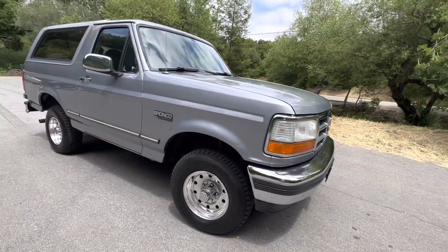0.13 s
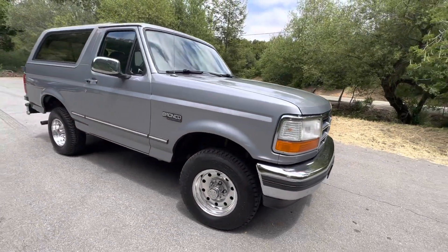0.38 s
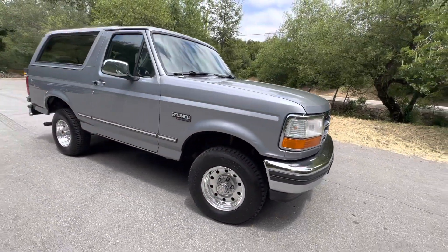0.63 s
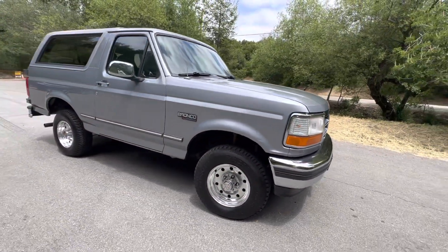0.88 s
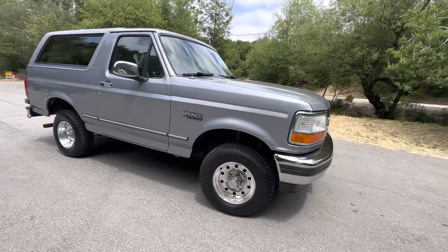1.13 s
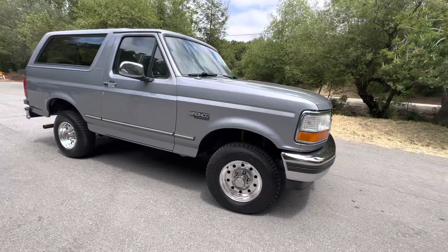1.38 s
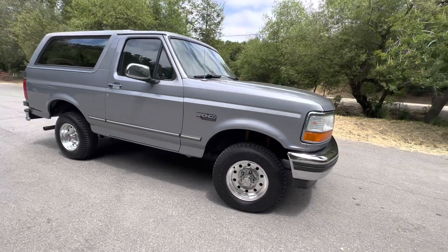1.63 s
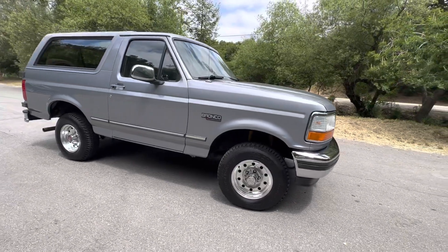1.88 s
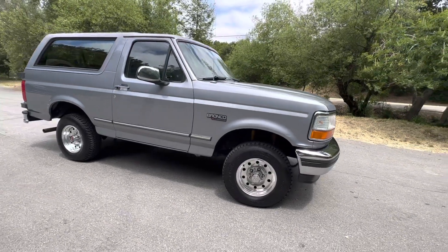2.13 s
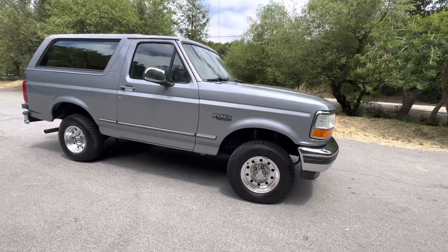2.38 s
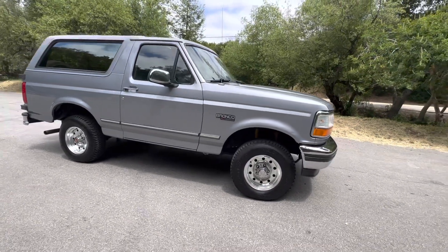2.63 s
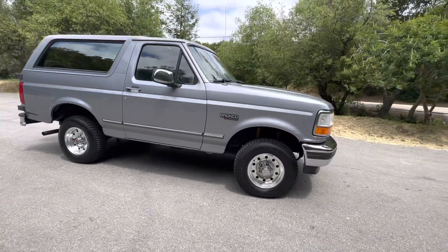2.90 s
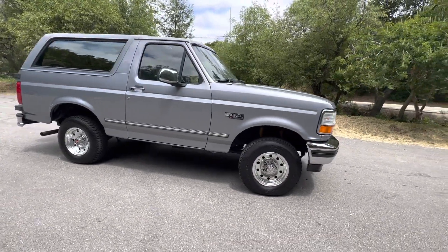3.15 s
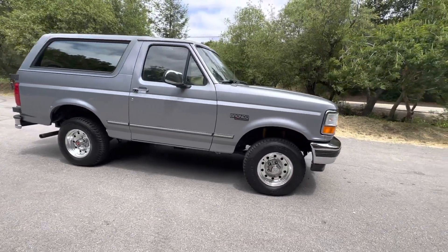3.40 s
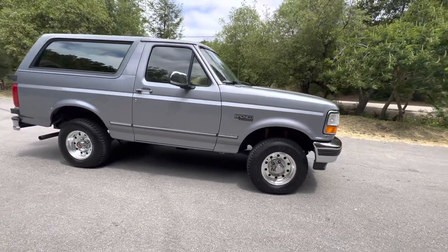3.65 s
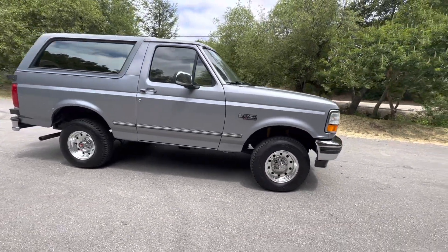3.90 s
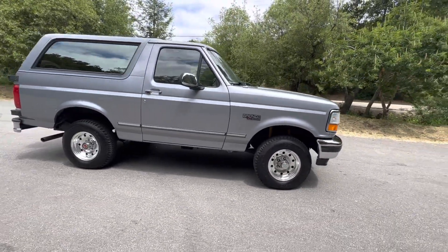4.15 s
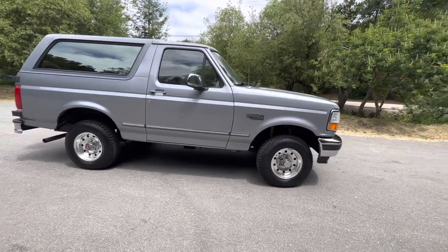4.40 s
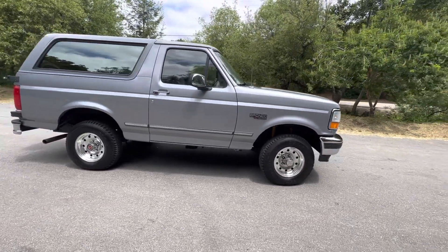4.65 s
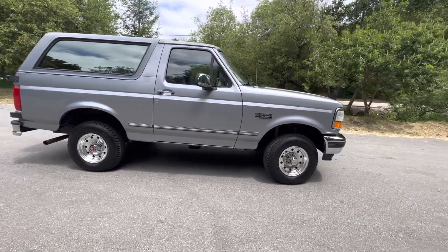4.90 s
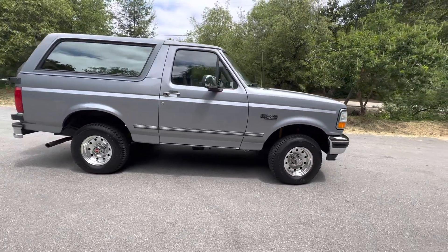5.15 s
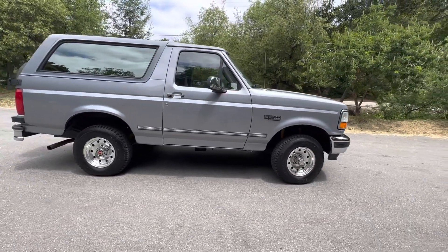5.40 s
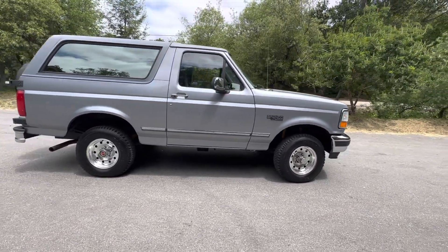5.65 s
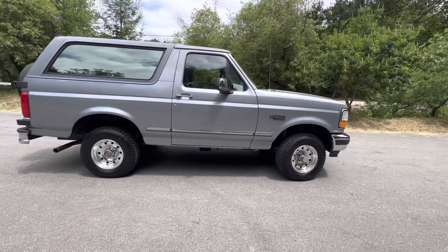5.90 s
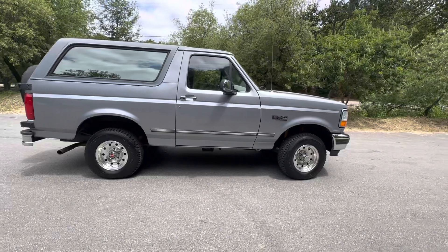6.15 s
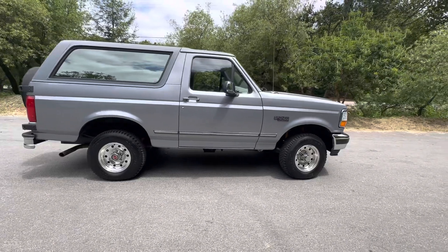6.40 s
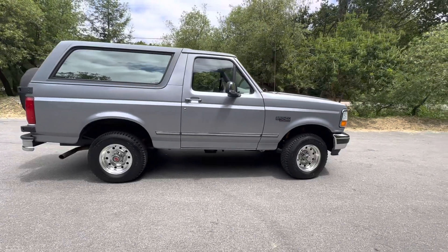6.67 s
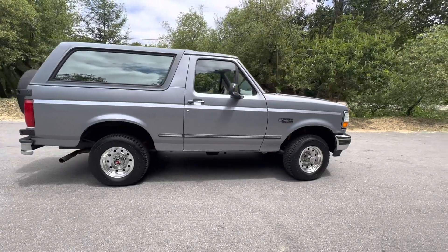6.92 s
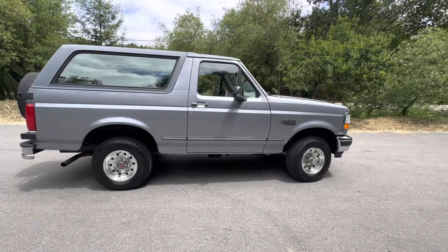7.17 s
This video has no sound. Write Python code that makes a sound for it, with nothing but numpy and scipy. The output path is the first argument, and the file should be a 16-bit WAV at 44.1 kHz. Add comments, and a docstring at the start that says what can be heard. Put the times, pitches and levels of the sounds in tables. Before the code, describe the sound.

Close, irregular footsteps crunch and tap on pavement, mostly small hollow knocks with crisp grit ticks and soft scuffs. Several birds sing in the wood alongside: bright repeated chips, sliding warbles and short buzzes, followed by a rapid descending trill and a buzzing series, then warbles return. A handheld stereo microphone picks up a deep uneven wind rumble, distant traffic drone and quiet leaf hiss, with birds and steps leaning left.

```python
"""Slow steps on gritty asphalt beside a wood

Someone walks slowly, holding a small two-port microphone. Soles knock, drag and squeak: damped rings,
bursts of random grit clicks and short gliding tones. Several birds chip, warble, whistle, buzz and trill
as sines on fast pitch tracks, smeared by a noise-built haze of trees. Far traffic and wind on the ports
rumble and leaves hiss, all as shaped, flickering noise."""
import sys
import numpy as np
from scipy import signal
from scipy.fft import rfft, irfft, next_fast_len
from scipy.io import wavfile
from scipy.ndimage import uniform_filter1d

SR = 44100
rng = np.random.default_rng(int(sys.argv[2]) if len(sys.argv) > 2 else 0)


def volts_from_decibels(level):
    """Turn decibel levels (scalar or array-like) into linear amplitude factors."""
    exponent = np.asarray(level, float) / 20
    return 10 ** exponent


def inscribe(sig):
    """Save sig as 16-bit PCM at rate SR to the path in sys.argv[1].

    A 1-D sig is mono; a 2-D sig holds one channel per row.
    Samples are clipped to [-1, 1] before scaling.
    """
    pcm = np.round(np.clip(np.atleast_2d(sig).T, -1, 1) * 32767)
    wavfile.write(sys.argv[1], SR, pcm.astype(np.int16))


N = 321515
MARGIN = 512  # samples carried on past each end before a phase turn


def columns(rows):
    """Curve columns read at every sample."""
    s, *rest = np.transpose(rows)
    return [np.interp(np.arange(N) / SR, s, c) for c in rest]


def along(rows, size):
    """A (f/Hz, value) table read at every FFT bin, straight on a log-frequency axis."""
    hz, value = np.transpose(rows)
    bin_hz = np.arange(size // 2 + 1) * SR / size
    return np.interp(np.log(bin_hz + 1), np.log(hz), value)


def unit(x):
    """Scale to rms 1."""
    return x / np.sqrt(np.mean(x ** 2))


def pan(db):
    """Left and right gains for a level difference."""
    return volts_from_decibels(np.array([db, -db]) / 2)


def add(out, s, sound):
    """Mix a two-channel sound in at time s."""
    i = int(s * SR)
    out[:, i:i + sound.shape[1]] += sound[:, :N - i]


def band(x, lo_hz, hi_hz):
    """Band-pass."""
    return signal.sosfilt(signal.butter(2, [lo_hz, hi_hz], "band", fs=SR, output="sos"), x)


def walk(rate):
    """Random levels held 1 / rate s and slewed twice; spread near 1."""
    k = int(SR / rate)
    held = np.repeat(rng.standard_normal(N // k + 1), k)
    return 1.17 * uniform_filter1d(uniform_filter1d(held, k), k)[:N]


def swells(rows):
    """Level curve of bursts (middle, half length, dB), bell-shaped in power over a faint rest."""
    t = np.arange(N) / SR
    rest_db = -86
    bells = sum(volts_from_decibels(2 * db) * np.exp(-2 * ((t - s) / half) ** 2) for s, half, db in rows)
    return np.sqrt(volts_from_decibels(2 * rest_db) + bells)


def noise(shape, alike, flicker_db, rate, tilt):
    """Two-channel noise of a given spectrum and likeness between ports; each half octave flickers alone."""
    size = next_fast_len(N)
    mid, side = rfft(rng.standard_normal((2, size)))
    c = np.clip(alike, 0, 1)
    pair = np.array([mid, c * mid + np.sqrt(1 - c * c) * side])
    pair *= volts_from_decibels(along(shape, size)) * pan(along(tilt, size))
    octave = np.log2(np.arange(size // 2 + 1) * SR / size + 1)
    lo, hi = np.log2(shape[0][0]), np.log2(shape[-1][0])
    pair *= (octave > lo) & (octave < hi)
    out = 0
    for centre in np.arange(lo, hi + .5, .5):
        weight = np.clip(1 - 2 * abs(octave - centre), 0, 1)
        out = out + irfft(pair * weight, size)[:, :N] * volts_from_decibels(flicker_db * walk(rate))
    return unit(out)


def tone(hz, gain):
    """A sine along a pitch track, with soft ends."""
    i = np.arange(len(hz))
    ends = np.clip(np.minimum(i, i[::-1]) / (0.0011 * SR), 0, 1)
    return np.sqrt(2) * gain * np.sin(2 * np.pi * np.cumsum(hz) / SR) * ends


def notes(slides, pan_db, flutter_db, shake_hz, bends=(), dives=()):
    """Near-pure notes: slides ease between pitches, bends arch, dives settle; air makes them flutter."""
    out = np.zeros((2, N))
    flutter = volts_from_decibels(flutter_db * np.array([walk(70.), walk(70.)]))
    shake = shake_hz * walk(300.)
    glides = (lambda u: np.sin(np.pi / 2 * u) ** 2,
              lambda u: np.sin(np.pi * u) ** 2,
              lambda u: 1 - np.exp(-u / .26))  # settling time as a share of the note
    for glide, rows in zip(glides, (slides, bends, dives)):
        for s, length, from_hz, to_hz, db in rows:
            t = np.arange(0, length, 1 / SR)
            track = from_hz + (to_hz - from_hz) * glide(t / length)
            track = track + shake[int(s * SR):][:len(t)]
            note = tone(track, volts_from_decibels(db) * np.hanning(len(t)) ** 0.12)
            add(out, s, note * pan(pan_db)[:, None])
    return out * flutter


def mirrored(x):
    """Carry the sound on smoothly past both ends and let it fade there."""
    wide = np.pad(x, MARGIN, mode="reflect", reflect_type="odd")
    return wide * signal.windows.tukey(len(wide), 2 * MARGIN / len(wide))


def steps():
    """Each knock is a damped ring of a cycle or two with a crumble of grit; ticks are single snaps."""
    # sole knocks on grit: t/s, level/dB, ring f/Hz, crumble level re knock/dB
    knocks = [(0.198, -59, 1750, -1.5), (0.425, -52.5, 853, -22), (1.274, -44, 1160, -23.5),
              (1.444, -46, 1280, -12.5), (1.454, -40.5, 1550, -43), (1.571, -46.5, 1340, -28),
              (1.634, -60, 1490, -4), (2.195, -45, 1240, -30), (2.433, -52.5, 1270, -17),
              (2.471, -41.5, 1240, -21), (2.547, -49.5, 1290, -22), (3.035, -54, 1400, -3.5),
              (3.332, -50.5, 930, -10), (3.998, -46, 1240, -35), (4.051, -51, 1240, -20),
              (4.2, -49, 1550, -16.5), (4.893, -58.5, 1570, -5), (4.954, -51, 1210, -22),
              (5.104, -49, 1520, -17), (5.85, -52.5, 1010, -13), (6.086, -54, 1370, -10.5),
              (6.769, -44, 1530, -20), (7.054, -51.5, 1350, -19)]
    # bright grit ticks: t/s, level/dB, top-band peak re lower-band peak/dB
    ticks = [(0.1877, -57, -7), (0.619, -47, -18.5), (1.443, -59, 14), (2.3724, -54.5, -17),
             (2.433, -41.5, -17), (2.4473, -45.5, 0.5), (2.504, -39.5, -32), (2.7352, -56, -17.5),
             (3.036, -46.5, -20.5), (3.062, -69, 8.5), (3.43, -62.5, 3.5), (3.914, -52, -20.5),
             (3.995, -51, -21.5), (4.17, -76, 15), (4.8907, -65, 4.5), (5.8480, -54, -12)]
    out, t = np.zeros((2, N)), np.arange(int(.09 * SR)) / SR
    for (s, db, hz, grit_db), grit in zip(knocks, rng.standard_normal((len(knocks), 2, len(t)))):
        ring = np.sin(2 * np.pi * hz * t) * np.exp(-t * hz * .7)
        # harder knocks snap brighter
        snap = volts_from_decibels(1.3 * (db + 40)) * 1.6 * np.sin(2 * np.pi * 3500 * t) * np.exp(-t / .0003)
        # noise raised to odd powers is spiky: separate grains of grit
        spiky = grit[0] ** 5 / 4 + grit ** 3
        crumble = unit(band(band(spiky, 700, 2500), 700, 2500))
        crumble = volts_from_decibels(grit_db) * crumble * np.exp(-t / 0.032) * np.tanh(t / 0.0036)
        add(out, s, volts_from_decibels(db) * (crumble - ring - snap) * pan(6.4)[:, None])
    for (s, db, top_db), grit in zip(ticks, rng.standard_normal((len(ticks), len(t)))):
        burst = grit * (np.exp(-t / .0006) + volts_from_decibels(-22) * np.exp(-t / 0.011))
        low, top = band(burst, 5500, 8600), band(burst, 13000, 15500)
        snap = low / abs(low).max() + volts_from_decibels(top_db) * top / abs(top).max()
        add(out, s, volts_from_decibels(db) * snap * pan(2.6)[:, None])
    return out


def squeaks():
    """Soles squeak on the asphalt: short tones that glide in pitch."""
    # t/s, length/s, from f/Hz, to f/Hz, level/dB
    squeak_rows = [(3.63, 0.062, 2050, 1646, -73.5), (3.885, 0.057, 1740, 2010, -73.5),
                   (4.205, 0.069, 1610, 1267, -72), (4.21, 0.045, 2100, 1810, -76),
                   (4.888, .022, 2610, 2400, -69), (4.898, 0.048, 1660, 1440, -72)]
    return notes(squeak_rows, pan_db=5.6, flutter_db=3.4, shake_hz=60.)


def grains(rate, spread):
    """Random clicks of uneven size."""
    size = volts_from_decibels(spread * rng.exponential(size=N))
    return (rng.random(N) < rate / SR) * size * rng.choice([-1, 1], N)


def taps(rate, unevenness, spread_db):
    """Clicks at a loosely steady pace."""
    chance = rng.standard_normal((int(N / SR * 80), 2))
    at = np.cumsum(SR / rate * np.exp(unevenness * chance[:, 0])).astype(int)
    out = np.zeros(N)
    out[at[at < N]] = volts_from_decibels(spread_db * chance[at < N, 1])
    return out


def scuff():
    """Dense grit under the dragged sole, a brighter hazy hiss that swells alongside, rolls of hollow taps."""
    # sole dragged over grit: middle t/s, half length/s, level/dB
    drag_swells = [(.43, 1, -79), (1.6, 0.22, -70.5), (2.41, 0.36, -75), (3.3, 0.64, -74.5),
                   (4.2, 0.3, -74), (5.02, 0.42, -76.5), (6.1, 0.17, -74.5), (6.8, 0.38, -76.5)]
    # rolls of dull hollow taps: middle t/s, half length/s, level/dB
    patter_swells = [(1.08, 0.43, -72), (1.6, 0.24, -73.5), (2.84, 0.39, -71), (4.72, 0.48, -73),
                     (6.52, 0.22, -71.5)]
    hiss_db = -1  # re the grit
    drag = unit(band(grains(1600, 2.0), 950, 2100))
    patter = unit(band(taps(42, .35, 4.6), 565, 772))
    hiss = unit(band(rng.standard_normal((2, N)), 2200, 4570))
    swelling = swells(drag_swells) * (drag + volts_from_decibels(hiss_db) * hiss)
    return (swelling + swells(patter_swells) * patter) * pan(5.1)[:, None]


def warbler():
    """Warbled notes, whole and as heard direct through leaves; a hidden bird sounds hoarser."""
    # notes from one pitch to another: t/s, length/s, from f/Hz, to f/Hz, level before cover/dB
    slides = [(1.14, 0.021, 2395, 2396, -67), (1.545, 0.018, 3450, 3370, -72),
              (1.68, 0.056, 3320, 3980, -68), (1.79, 0.059, 3580, 2590, -68),
              (1.83, 0.039, 2620, 2780, -66.5), (1.875, 0.033, 3150, 3500, -70.5),
              (1.902, 0.017, 3590, 3030, -69.5), (1.94, 0.019, 3940, 4300, -68),
              (1.96, 0.036, 4300, 5280, -72), (2.07, 0.017, 5050, 4400, -63),
              (2.095, 0.016, 4280, 4100, -63), (2.185, 0.043, 3410, 2623, -65),
              (2.28, 0.041, 3475, 3780, -62), (2.362, 0.023, 2380, 2790, -65.5),
              (2.405, 0.012, 2490, 2470, -66), (2.515, 0.069, 4800, 4130, -66.5),
              (3.01, 0.025, 2370, 2550, -68), (3.115, 0.028, 2685, 2580, -72),
              (3.335, 0.068, 3830, 4360, -62), (6.04, 0.066, 2570, 2200, -75),
              (6.222, 0.053, 4230, 2950, -67), (6.278, 0.038, 3150, 4220, -67.5),
              (6.54, 0.048, 4704, 4405, -66), (6.745, 0.029, 2930, 2800, -68),
              (6.775, 0.049, 2850, 3990, -67), (6.81, 0.02, 4070, 3610, -63),
              (7.04, 0.022, 3055, 3350, -66.5), (7.06, 0.023, 3580, 3790, -60),
              (7.155, 0.041, 3300, 2820, -66), (7.198, .042, 2750, 3280, -65.5)]
    # notes that bend away and come back: t/s, length/s, edge f/Hz, turn f/Hz, level before cover/dB
    bends = [(1.466, 0.049, 3360, 3940, -69.5), (1.819, 0.036, 3940, 4870, -61.5),
             (2.321, 0.029, 3270, 2700, -65), (2.747, 0.046, 3590, 4730, -60.5),
             (3.235, 0.045, 3520, 3920, -61.5), (5.871, 0.046, 2860, 3190, -75),
             (6.431, .055, 3300, 2816, -68)]
    # fast dives that settle on a pitch: t/s, length/s, from f/Hz, to f/Hz, level before cover/dB
    dives = [(2.551, .11, 5390, 4370, -67), (2.713, 0.034, 4110, 3780, -60.5),
             (5.763, 0.019, 4760, 4210, -73), (6.83, 0.062, 3290, 2260, -69.5),
             (6.992, 0.034, 4940, 4520, -68)]
    # leaves between warbler and microphone: t/s, direct sound level/dB
    cover = [(1.6, -2.5), (1.72, -7), (1.8, -6), (1.87, -4.5), (1.95, 1), (2.2, -4), (2.45, 0), (5.9, -1.5),
             (6.3, -4.5), (6.45, -8), (6.55, -2), (6.8, -1), (7.02, 0), (7.07, -8.5), (7.29, -4.5)]
    cover_db = columns(cover)[0]
    shake_hz = 40.5 + 37.5 * np.maximum(-cover_db, 0)
    song = notes(slides, 6.3, 4.8, shake_hz, bends, dives)
    return song, volts_from_decibels(cover_db) * song


def whistler():
    """Thin held whistles: near-pure tones with little shake."""
    # t/s, length/s, from f/Hz, to f/Hz, level/dB
    whistles = [(.83, .06, 8460, 9120, -79.5), (.89, 0.29, 8930, 8100, -81.5), (.9, 0.22, 8630, 7750, -82),
                (1.695, 0.047, 5710, 6070, -62), (1.73, 0.074, 5870, 6010, -66.5),
                (1.815, 0.1, 6100, 6050, -66.5), (2.105, 0.092, 6070, 6060, -68.5),
                (2.3, 0.09, 5980, 6030, -76), (2.808, 0.052, 3085, 3034, -66.5),
                (2.865, 0.097, 3040, 3014, -77), (3.055, 0.044, 3060, 2994, -72),
                (3.22, 0.071, 3230, 3216, -66.5)]
    return notes(whistles, pan_db=6.9, flutter_db=2.8, shake_hz=8.)


def chips():
    """A very fast plunge in pitch, then a hoarse rebound that rings out."""
    # t/s (calls begin 1 ms ahead), level before the mix/dB
    calls = [(0.262, -53.5), (1.22, -54.5), (1.601, -55), (2.005, -54), (2.395, -53.5), (2.855, -55),
             (3.8109, -52.5), (4.167, -52), (4.5697, -54), (5.0337, -54), (6.1544, -55.5), (6.5949, -55.5),
             (6.955, -55.5)]
    out, t = np.zeros((2, N)), np.arange(int(0.042 * SR)) / SR
    hz = np.interp(t, [0, .002, .005, .008, .025], [7960, 6860, 4920, 6130, 6540])
    for (s, db), hoarse in zip(calls, rng.standard_normal((len(calls), len(t)))):
        track = hz + 4000 * uniform_filter1d(hoarse, size=60)
        gain = volts_from_decibels(db - 0.66 * (t < .007)) * np.exp(-t / 0.011)
        add(out, s - .001, tone(track, gain) * pan(8.8)[:, None])
    return out


def trill():
    """Each syllable drops to a short hoarse low note, then scatters upward in a fainter rasp."""
    start_s, gap_s, level_db = 3.42, .0675, -61.5
    top_hz, low_hz, low_note_s = 5870, 4940, 0.017
    droop_hz = 9.9  # per syllable
    sag_hz, fade_db = 44.3, -1  # per syllable after the fifth
    rasp_db, rasp_grows_db = -6, 0.56  # re the low note; the rasp fades less than it does
    out, t = np.zeros((2, N)), np.arange(int(.05 * SR)) / SR
    rasp = t > low_note_s
    for k, hoarse in enumerate(rng.standard_normal((10, len(t)))):
        late = max(k - 4, 0) + 2 * (k == 0)  # the first is soft and low too
        base_hz = low_hz - droop_hz * k - sag_hz * late
        track = base_hz + (top_hz - low_hz) * (np.exp(-t / 0.00286) + 0.83 * rasp)
        track = track + (1100 + 4500 * rasp) * uniform_filter1d(hoarse, size=90)
        gain = volts_from_decibels(level_db + fade_db * late + (rasp_db + rasp_grows_db * late) * rasp)
        add(out, start_s + k * gap_s, tone(track, gain) * pan(5.5)[:, None])
    return out


def buzzes():
    """Pitch scoops up, shakes fast and unevenly, then slides down and fades; wide slides shake more."""
    # t/s, length before the slide/s, end f/Hz, level before the mix/dB, left minus right/dB
    singles = [(1.353, 0.057, 5130, -62.5, 6), (1.472, 0.044, 5440, -61.5, 4),
               (3.109, 0.052, 4650, -59.5, 10), (3.247, 0.038, 4450, -61, 8.5),
               (3.364, 0.032, 5960, -61.5, 11.5), (3.502, 0.047, 5250, -65.5, 9)]
    centre_hz, slide_s = 7000, 0.018
    # a run of seven short buzzes, strong and weak in turn
    run = [(5.085 + k * .0625, .025, 6080, -62.5 + k % 2 * -7, -1) for k in range(7)]
    out, shake = np.zeros((2, N)), walk(500.)
    for s, length, end_hz, db, lr in singles + run:
        t = np.arange(0, length + slide_s, 1 / SR)
        wobble = 0.14 * np.sin(2 * np.pi * 170 * t) + 0.18 * shake[int(s * SR):][:len(t)]
        track = np.interp(t, [0, .012, length, length + slide_s],
                          [centre_hz - 900, centre_hz, centre_hz, end_hz])
        track = track + (centre_hz - end_hz) * wobble * (t < length)
        gain = volts_from_decibels(db - 2.4 * (t > length) - 2.1 * (t < .012))
        add(out, s, tone(track, gain) * pan(lr)[:, None])
    return out


def wood(x):
    """Trunks and leaves scatter sound into a decaying haze, different at each port."""
    t60_s = 0.92  # of the far wood
    t = np.arange(int(.8 * SR)) / SR
    # near branches answer first and densely, the far wood lingers
    fade = np.exp(-t / 0.011) + volts_from_decibels(-6.5) * np.exp(-np.log(1000) * t / t60_s)
    haze = rng.standard_normal((2, len(t))) * fade * (t > .002)
    return signal.fftconvolve(x, haze / np.sqrt(np.sum(haze ** 2) / 2), axes=1)[:, :N]


def drift(pair, radians):
    """The right port's phase wanders, as gusts cross the two ports from changing sides."""
    analytic = signal.hilbert(mirrored(pair[1]), next_fast_len(2 * N))[MARGIN:MARGIN + N]
    turned = analytic * np.exp(1j * radians * walk(4.))
    return np.array([pair[0], turned.real])


def rumble():
    """Deep gusts on the ports, and far traffic: a drone, its upper part and a narrower hum."""
    # spectra of gusts, drone and upper drone: f/Hz, relative level per Hz/dB
    deep_shape = [(22, -28), (35, -20.5), (62, -4), (87, -4), (130, -15.5)]
    drone_shape = [(90, -18.5), (118, 2.5), (152, -1), (220, -4), (285, -15)]
    upper_shape = [(230, -14.5), (280, -4.5), (340, -9), (420, -17), (560, -22)]
    # wind on the ports: t/s, level/dB
    gust = [(0, -53.5), (.3, -46), (1.0, -46.5), (1.54, -47), (2.2, -47), (2.6, -43.5), (3.27, -45),
            (3.36, -37.5), (3.5, -44), (3.9, -42.5), (3.985, -36), (4.1, -42.5), (4.25, -40.5),
            (4.6, -55.5), (5.6, -53), (6.6, -47), (7.29, -49)]
    # far traffic: t/s, level of the drone/dB
    traffic = [(0, -51.5), (2.05, -56), (3.61, -52), (4.35, -46.5), (4.55, -58), (5.55, -50), (6.5, -51),
               (7.29, -56)]
    # how dull the traffic is: t/s, upper drone re drone/dB
    dulling = [(0, -17.5), (1.8, -7.5), (2.8, -13), (3.5, -11.5), (4.1, -20.5), (4.4, -9.5), (5.3, -17.5),
               (7.29, -21)]
    # hum swelling in the traffic: middle t/s, half length/s, level/dB
    hum_swells = [(5.3, 0.53, -56)]
    tilt = [(40, 3.3), (300, 5.5)]  # f/Hz, left minus right/dB
    deep = drift(noise(deep_shape, .75, 1.5, 6., tilt), radians=2.2)
    drone = drift(noise(drone_shape, .75, 1.2, 8., tilt), radians=1.3)
    upper = volts_from_decibels(columns(dulling)[0]) * noise(upper_shape, 0.95, 2.95, 8., tilt)
    hum = swells(hum_swells) * noise([(200, 0.0011), (245, 0.0021)], 0.87, 2, 6., tilt)
    return volts_from_decibels(columns(gust)[0]) * deep + volts_from_decibels(columns(traffic)[0]) * (drone + upper) + hum


def leaves():
    """Leaf hiss and open air: shaped noise, little alike at the ports, slowly rising and falling."""
    # spectrum: f/Hz, relative level per Hz/dB
    hiss_shape = [(380, -3), (544, -6), (1490, -9.5), (1970, -14.5), (3580, -21), (4250, -18.5),
                  (4860, -13), (5700, -15.5), (6870, -6.5), (7950, -9), (9080, -19), (10200, -51.5),
                  (12000, -41), (14000, -34), (15600, -48.5)]
    # side of the hiss: f/Hz, left minus right/dB
    hiss_tilt = [(400, 12.4), (2000, 3.7), (6000, 25.5), (9500, 3.8)]
    breeze_db = 0.7 * walk(2.0)
    return volts_from_decibels(-67 + breeze_db) * noise(hiss_shape, 0.19, 1.0, 16.0, hiss_tilt)


def scene():
    """Birds deep in the wood are mostly haze, the nearer singers and the steps are drier."""
    feet = steps() + squeaks()
    warble, warble_direct = warbler()
    whistle, chip, triller, buzz = whistler(), chips(), trill(), buzzes()
    into_wood = volts_from_decibels(-0.5) * warble + volts_from_decibels(0.5) * whistle + volts_from_decibels(2.0) * chip
    into_wood = into_wood + volts_from_decibels(5.5) * buzz + volts_from_decibels(6.0) * triller + volts_from_decibels(-8.5) * feet
    birds = warble_direct + whistle + chip + volts_from_decibels(-2.0) * buzz + volts_from_decibels(0.6) * triller
    return feet + scuff() + birds + wood(into_wood) + rumble() + leaves()


def roll_off(x):
    """The treble ends steeply here."""
    return signal.sosfilt(signal.butter(12, 15500, fs=SR, output="sos"), x)


def record(dry):
    """The two ports hear each band with a different phase."""
    # f/Hz, phase by which the left port leads/rad
    port_phase = [(120, -0.37), (260, 0.22), (520, -2.5), (1200, -0.77), (2300, -1.85), (4600, -1.1),
                  (8000, -1.6), (12000, 1.55)]
    size = next_fast_len(2 * N)
    turn = np.exp(-1j * along(port_phase, size))
    right = irfft(rfft(mirrored(dry[1]), size) * turn, size)[MARGIN:MARGIN + N]
    mix = np.array([dry[0], right])
    return roll_off(mix)


dry = scene()
out = record(dry)
inscribe(out)
```